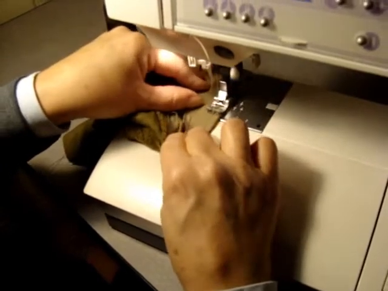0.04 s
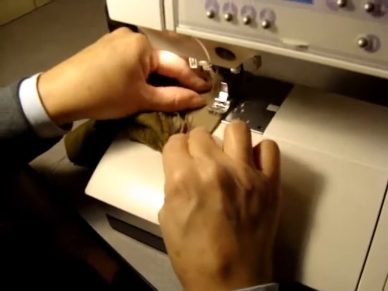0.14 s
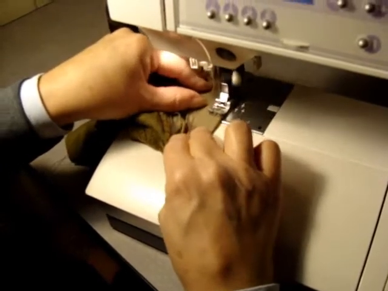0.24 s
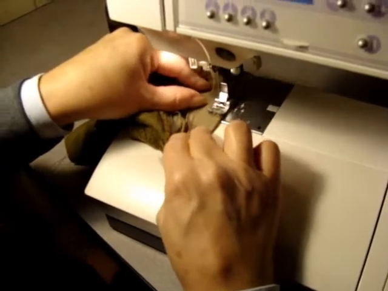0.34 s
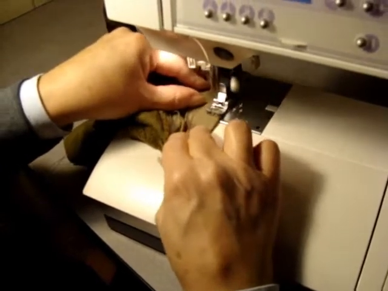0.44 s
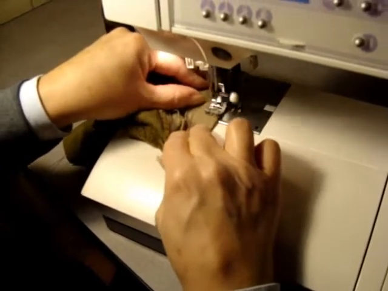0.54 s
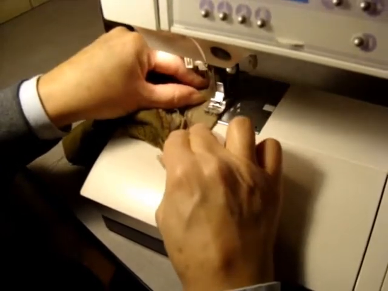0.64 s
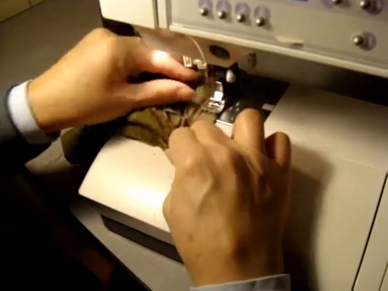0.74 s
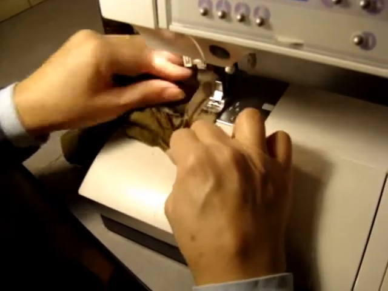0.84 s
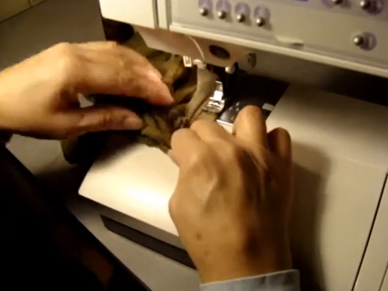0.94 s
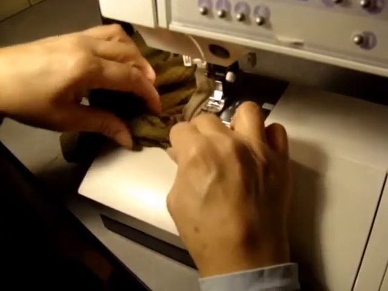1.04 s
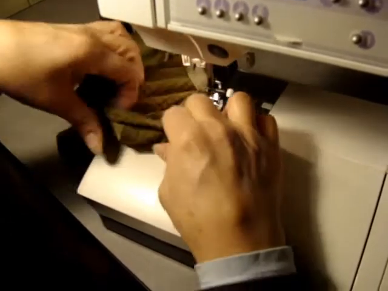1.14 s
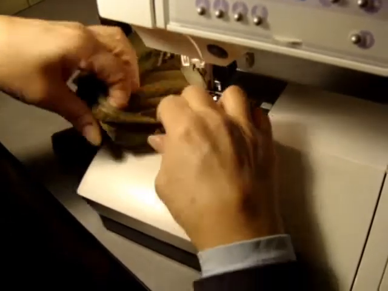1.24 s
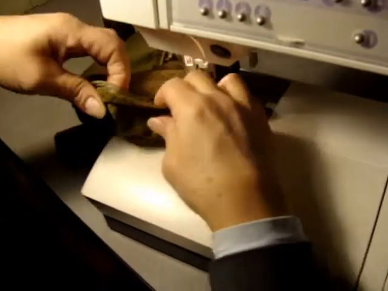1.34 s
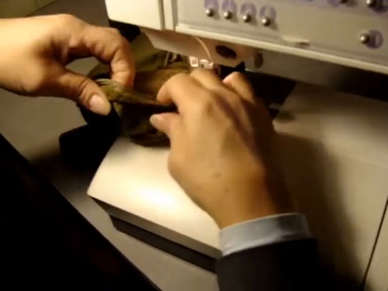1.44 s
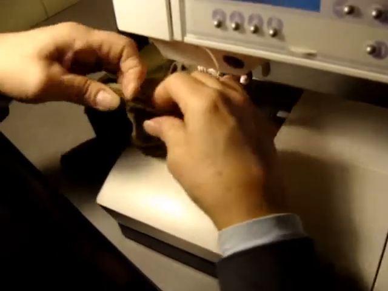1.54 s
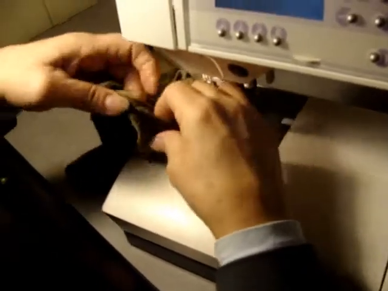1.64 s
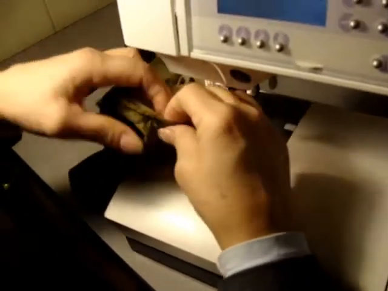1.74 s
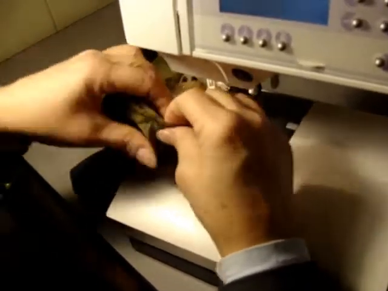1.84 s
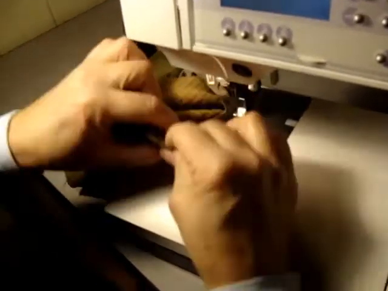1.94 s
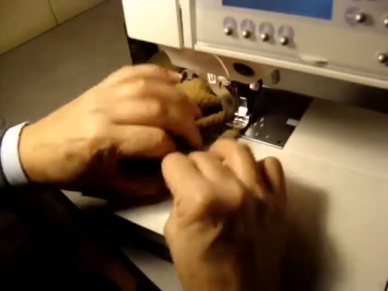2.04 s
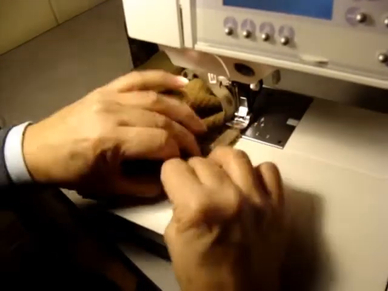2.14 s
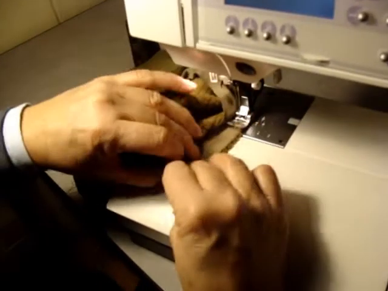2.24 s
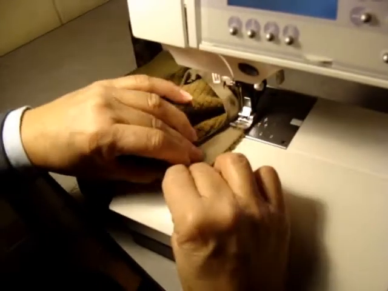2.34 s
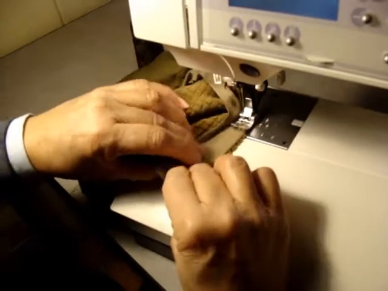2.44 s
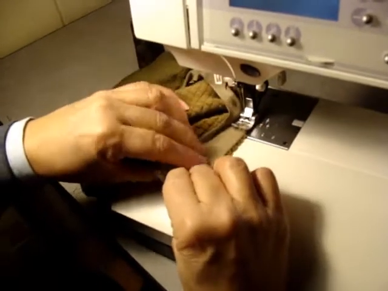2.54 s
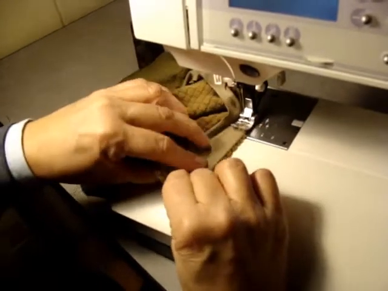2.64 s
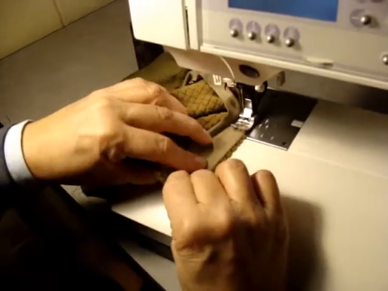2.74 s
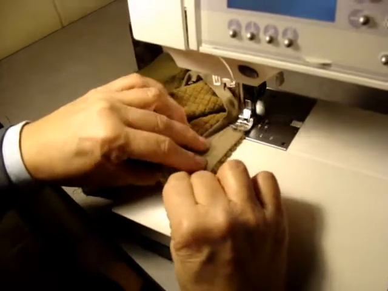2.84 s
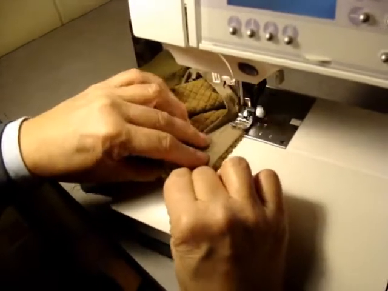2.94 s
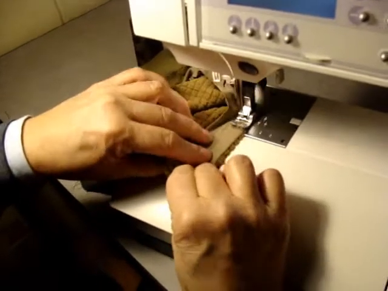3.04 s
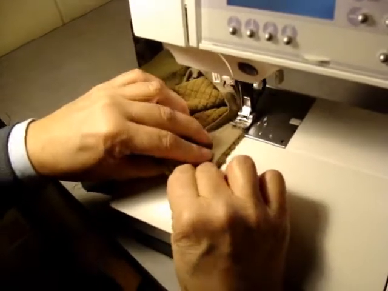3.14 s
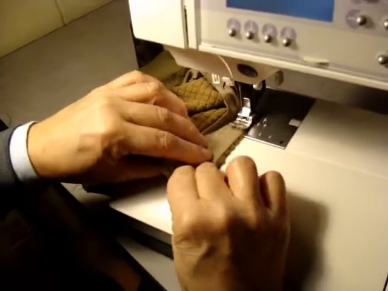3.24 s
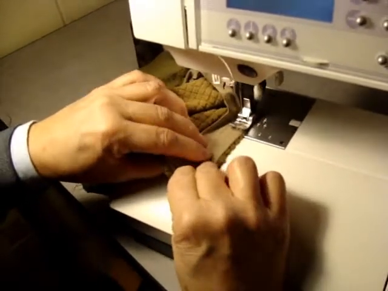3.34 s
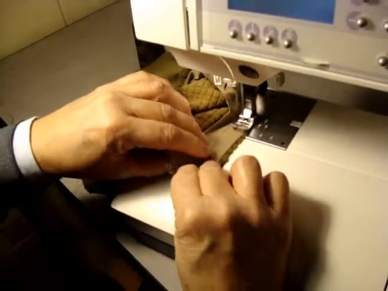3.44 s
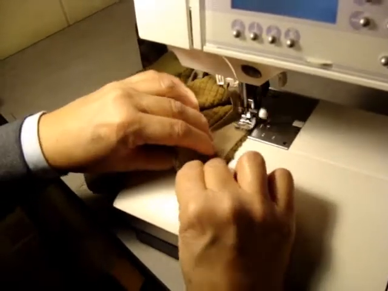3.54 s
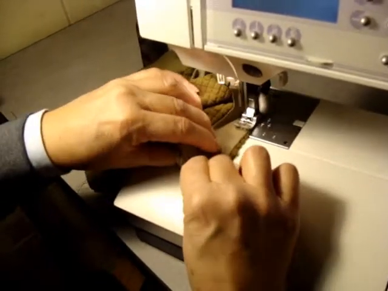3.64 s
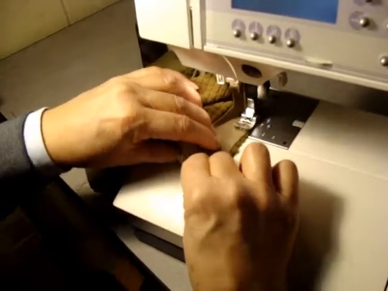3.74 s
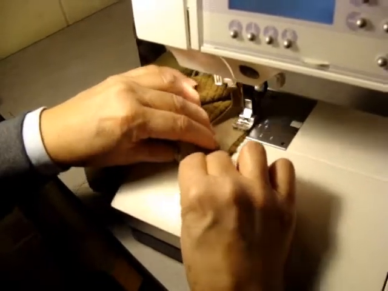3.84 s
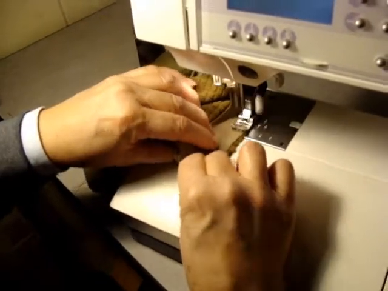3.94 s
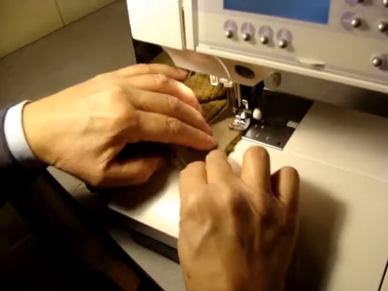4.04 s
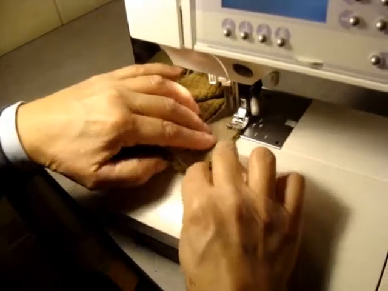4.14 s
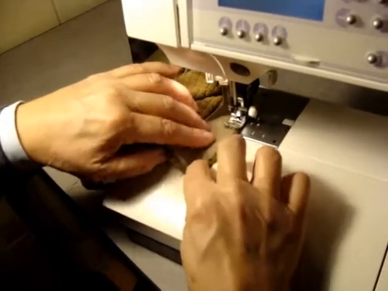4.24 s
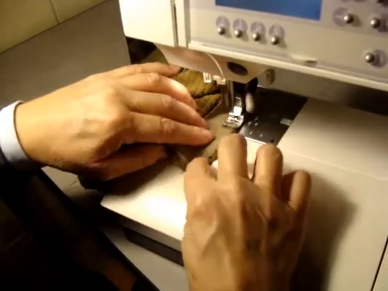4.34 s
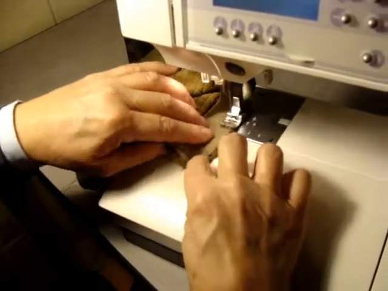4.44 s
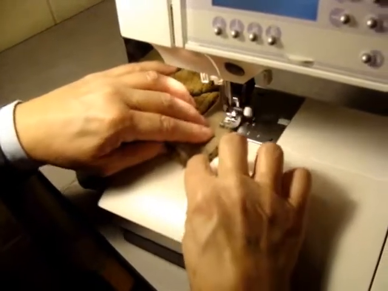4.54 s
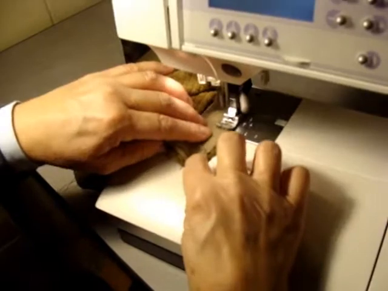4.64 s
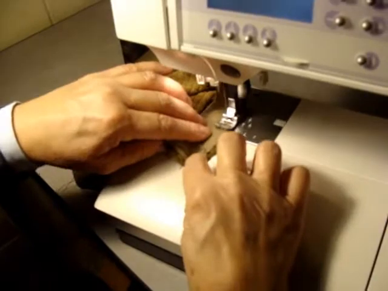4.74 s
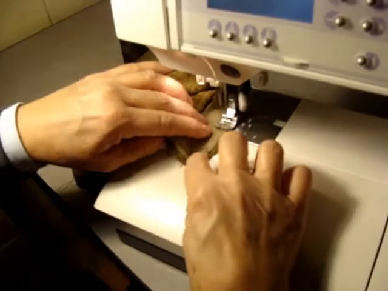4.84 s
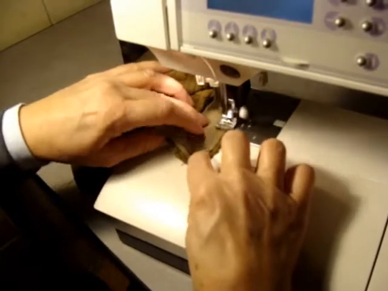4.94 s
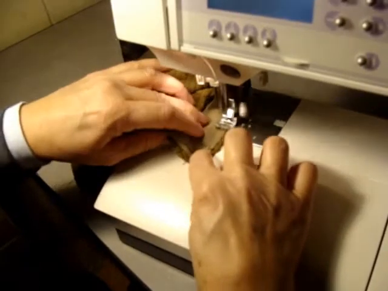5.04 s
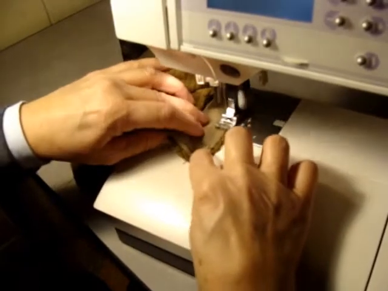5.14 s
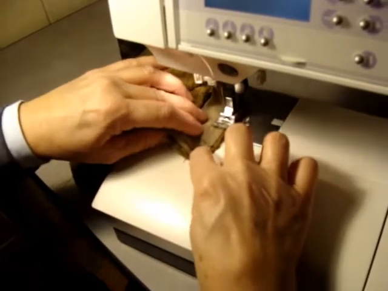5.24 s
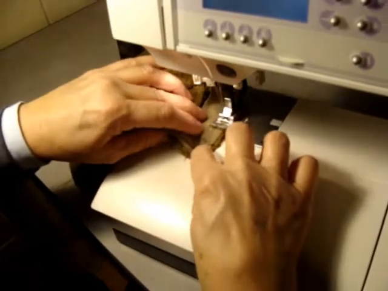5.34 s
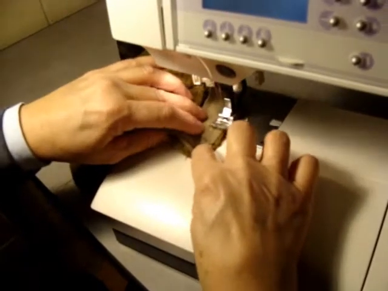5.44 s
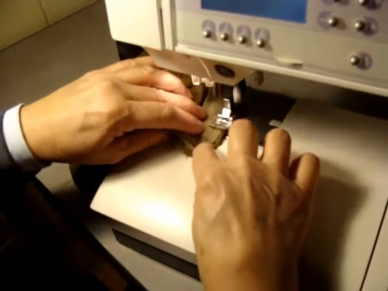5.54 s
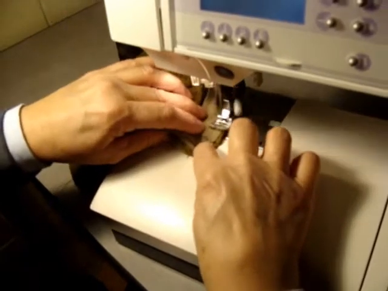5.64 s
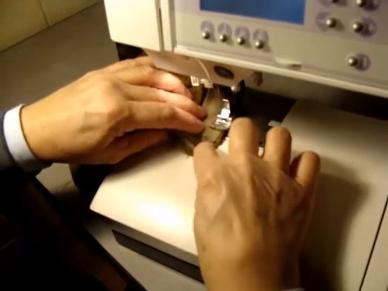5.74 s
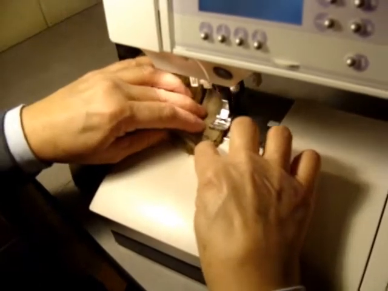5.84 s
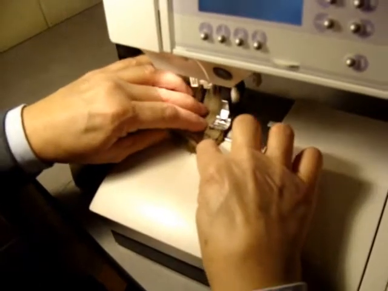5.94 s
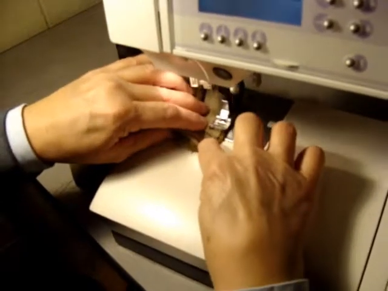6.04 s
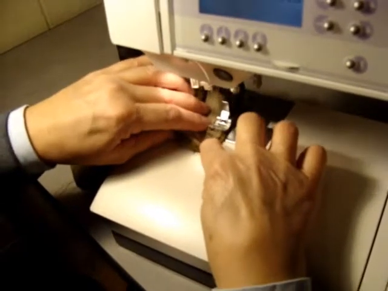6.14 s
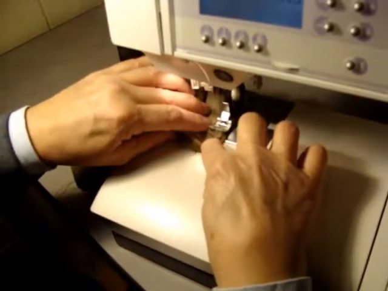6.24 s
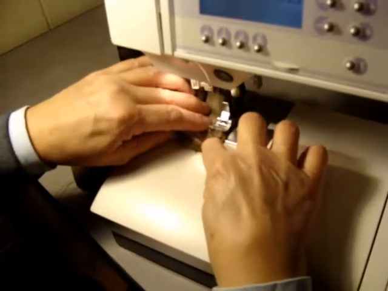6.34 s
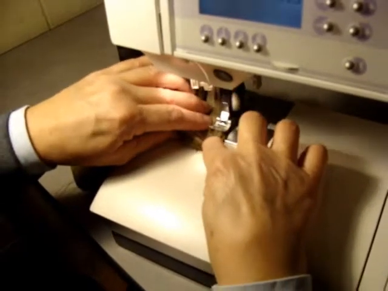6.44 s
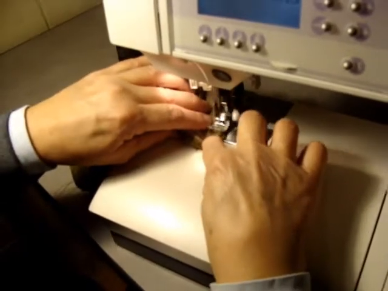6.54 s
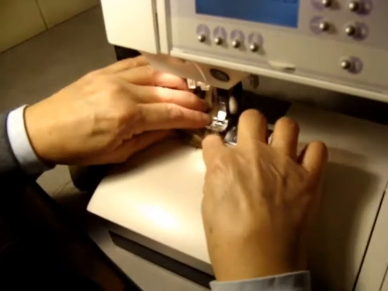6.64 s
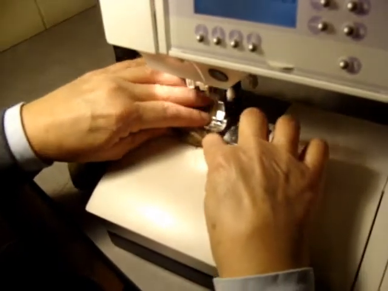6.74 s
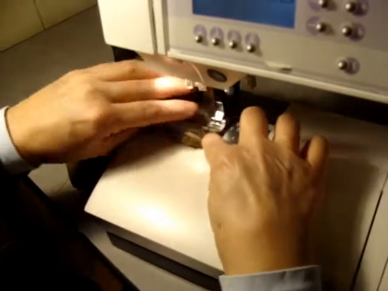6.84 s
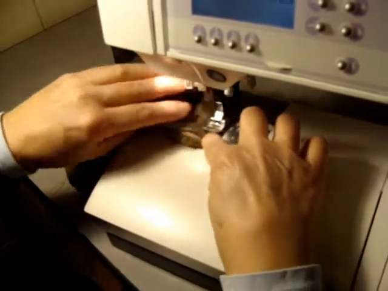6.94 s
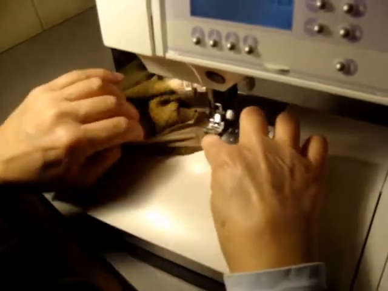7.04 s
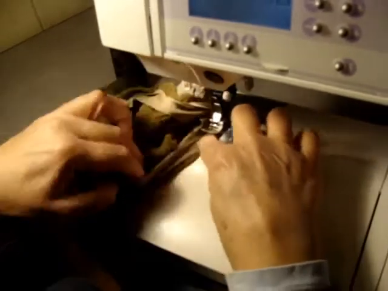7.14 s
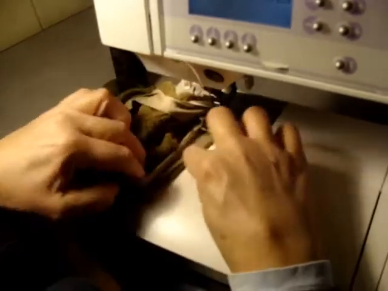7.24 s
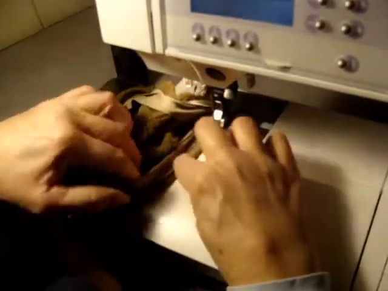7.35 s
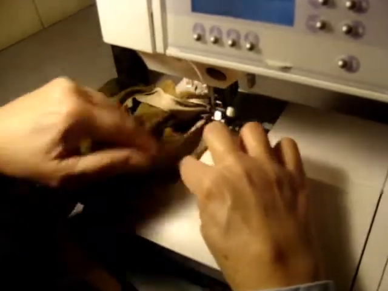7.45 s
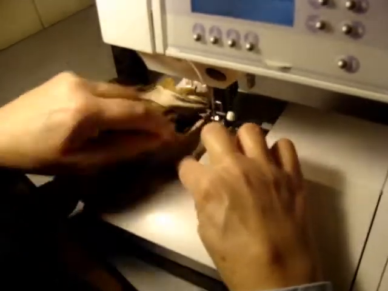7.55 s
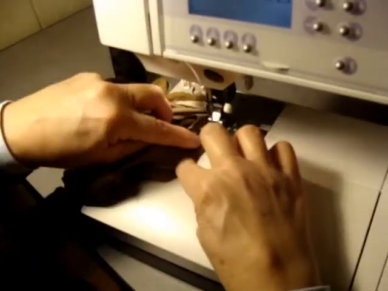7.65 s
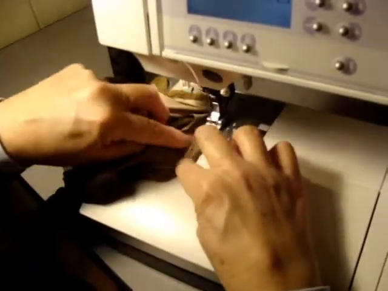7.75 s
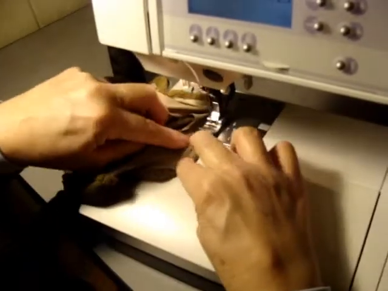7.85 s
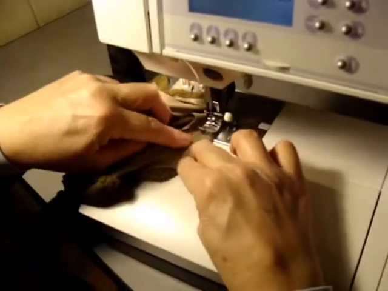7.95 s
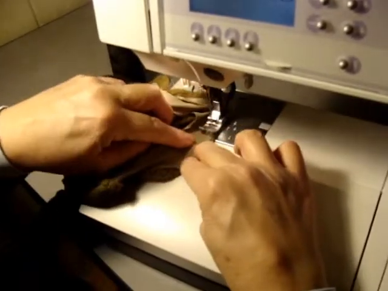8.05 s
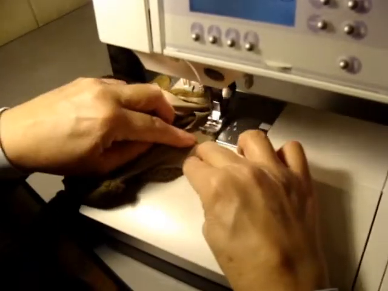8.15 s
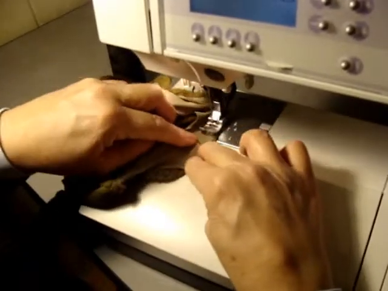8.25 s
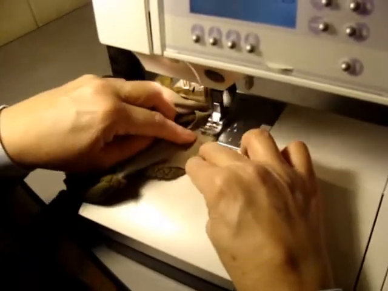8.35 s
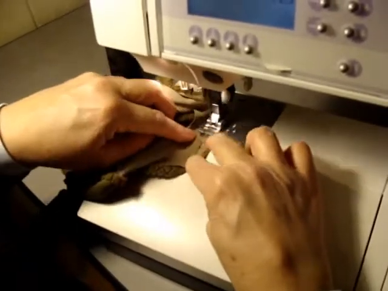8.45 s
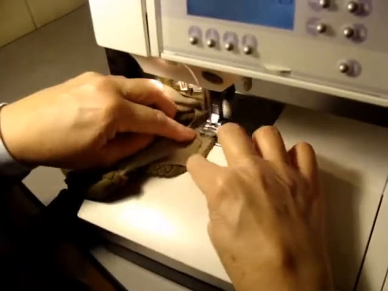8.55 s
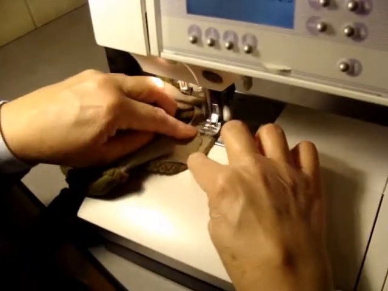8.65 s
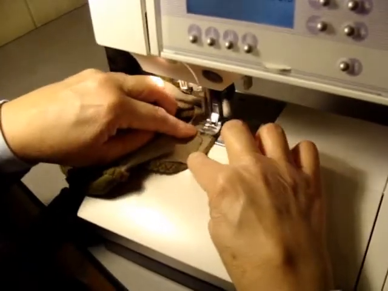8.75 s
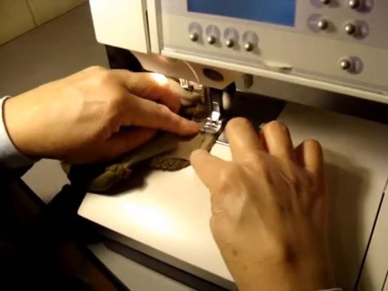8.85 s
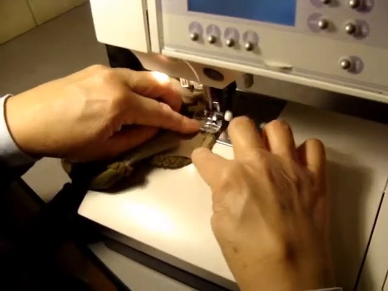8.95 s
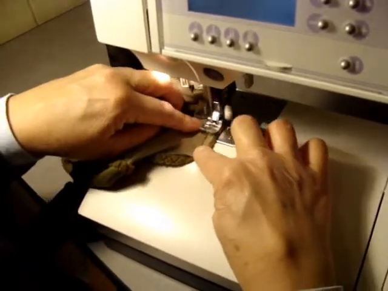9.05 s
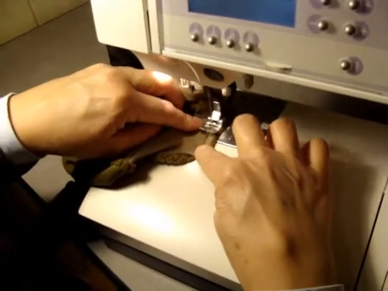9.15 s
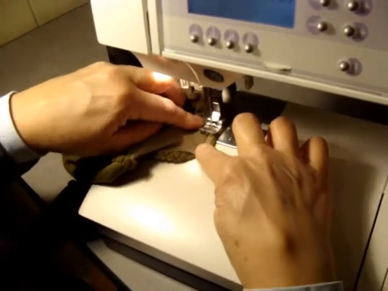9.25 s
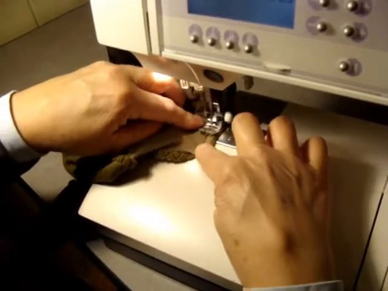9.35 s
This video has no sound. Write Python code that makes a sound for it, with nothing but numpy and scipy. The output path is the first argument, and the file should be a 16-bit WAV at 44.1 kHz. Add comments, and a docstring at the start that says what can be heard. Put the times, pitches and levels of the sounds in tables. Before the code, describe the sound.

Close mono sound of an electric sewing machine on a table: a short tail of slow stitching, a quiet pause with lone clicks and a dull bump, then about four seconds of rapid rattling stitches under a piercing nasal whine. It winds down into sparse ticks and creaky little contacts for a second, restarts with a lower growl, and climbs back to full whine. Short dull room echo and faint low air noise.

```python
"""A small room: an electric sewing machine sews in bursts on a table, heard by one close mono microphone.
Each brisk turn of the shaft brings the same knocks, struck on a ringing frame, and a rattle of small contacts.
The toothed drive is a swaying sine that whines, loudest where it meets the casing's ring near 1 kHz.
Between bursts the motor slows and lone parts click; a faint hum of sine lines dips when the rattle dies.
A hand bumps the table once; the walls return a dull tail of noise, over the steady air of the room."""
import sys
import numpy as np
from scipy import signal
from scipy.fft import rfft, irfft, next_fast_len
from scipy.io import wavfile
from scipy.ndimage import map_coordinates

SR = 44100
rng = np.random.default_rng(int(sys.argv[2]) if len(sys.argv) > 2 else 0)


def gain_from_db(level_db):
    """Turn a decibel level (scalar or array-like) into a linear amplitude factor."""
    decades = np.asarray(level_db, float) / 20
    return 10 ** decades


def unload_audio(sound):
    """Save the sound as a 16-bit wav file, at the path given as the first command line argument."""
    columns = np.transpose(np.atleast_2d(sound))
    # keep every value between -1 and 1, then stretch to whole-number steps
    steps = np.round(np.clip(columns, -1, 1) * 32767)
    wavfile.write(sys.argv[1], SR, steps.astype(np.int16))


N = 414540
BRISK_TURN_S = 0.25  # a shorter turn brings all the knocks and the repeating rattle


def rms_one(x):
    """Scale to unit power."""
    return x / np.sqrt(np.mean(x ** 2) + 1e-20)


def in_time(rows):
    """Columns of a curve table, sample by sample."""
    s, *columns = np.transpose(rows)
    return [np.interp(np.arange(N) / SR, s, column) for column in columns]


def drift(rate):
    """Slow random wander of spread about 1, through `rate` random points per second."""
    points = rng.standard_normal(int(N / SR * rate) + 3)
    return map_coordinates(points, [np.arange(N) / SR * rate], order=3)


def colour(x, spectrum, peaks=()):
    """Shape noise by a spectrum, lift its resonances and scale it to unit power."""
    size = next_fast_len(N)
    hz = np.arange(size // 2 + 1) * SR / size + 1e-3
    curve_hz, curve_db = np.transpose(spectrum)
    gain = gain_from_db(np.interp(np.log(hz), np.log(curve_hz), curve_db))
    for peak_hz, width_hz, db in peaks:
        resonance = 1 / (1 + 2j * (hz - peak_hz) / width_hz)
        gain = gain * (1 + (gain_from_db(db) - 1) * resonance)
    return rms_one(irfft(rfft(x, size) * gain, size)[:N])


def ring(x, hz, t60):
    """A damped resonance: a unit click sets a sine of height 1 ringing."""
    r, w = gain_from_db(-60 / (t60 * SR)), 2 * np.pi * hz / SR
    return signal.lfilter([0, np.sin(w)], [1, -2 * r * np.cos(w), r * r], x + 1e-18)


# needle bar strokes, between which the shaft turns evenly: (time [s], stroke level [dB])
STROKES = [(0.1286, -11), (0.451, -11), (0.7697, -13.5), (1.017, -17), (1.8409, -17), (3.026, -10.5),
           (3.1647, -10.5), (3.4028, -12), (4.2246, -14.5), (6.1885, -14), (6.8776, -12.5), (7.0167, -13),
           (7.431, -22), (8.2032, -10.5), (8.368, -11), (8.498, -11), (8.8779, -13.5), (9.377, -14)]
# whole turns done by each of those strokes: (count [turns])
TURN_COUNTS = [0, 2, 4, 5, 6, 7, 8, 10, 17, 34, 40, 41, 42, 43, 44, 45, 48, 52]


def turns():
    """Start (s), length (s) and stroke dB of every shaft turn, one more added in front."""
    count = np.arange(TURN_COUNTS[-1] + 1)
    s, db = (np.interp(count, TURN_COUNTS, column) for column in np.transpose(STROKES))
    start = np.r_[2 * s[0] - s[1], s]
    length = np.r_[np.diff(start), s[-1] - s[-2]]
    return start, length, np.r_[db[0], db]


# colour of the room's air: (frequency [Hz], relative level [dB])
AIR = [(15, -35), (25, 3.5), (113, -11.5), (273, 5), (333, -4.5), (538, 1.5), (746, -2.5), (1260, -13),
       (1750, -5.5), (2090, -13.5), (4120, -14.5), (9220, -21.5), (10200, -11.5), (13300, -77.5),
       (22000, -120)]
# a low waver in the room: (frequency [Hz], width [Hz], lift [dB])
LOW_WAVER = [(128, 12, 18.5)]


def room_air():
    """The still air of the room: coloured noise whose level wanders slowly."""
    return gain_from_db(-51.5 + drift(1.3)) * colour(rng.standard_normal(N), AIR, LOW_WAVER)


# load on the teeth round one turn: (angle [turn], added force at top pace [dB], at middle pace [dB])
TURN_LOAD = [(0.0, -3.5, -13), (.06, -5, -5.5), (.2, 0, -6), (0.329, -11, -3.5), (.42, -13, -8),
             (.52, -24, -4), (.6, 0, 7), (.7, -3, -11), (.77, 0, -1.5), (.84, -7, -14.5), (.92, 2, 5)]
# overtones of the mesh: (multiple of its rate [ratio], level under the mesh force [dB])
MESH_OVERTONES = [(2.002, -25)]
# speed sway once a turn, at slow, middle and top pace: (depth [%], fastest at angle [turn])
TURN_SWAY = [(7.164, .3), (.6, 0.37), (1.616, 0.715)]


def whine(mesh_hz, force_db):
    """Teeth mesh at a rate that sways round the turn; the casing amplifies it near its ring."""
    slow_pace, middle_pace, top_pace = 6.5, 8.1, 8.4  # turns per s
    stall_hz, free_hz = 620, 750  # the slow sway sets in between these mesh rates
    rotor_turns, rotor_throb_db, rotor_at_turn = 10, 1.5, 0.078  # rotor turns per shaft turn
    ripples_per_turn, ripple_percent, ripple_at_turn = 8, 1.4, 0.035
    casing_hz, casing_width_hz, bypass_db = 1008, 80, -18.5

    start, length, _ = turns()
    edges_s = np.r_[start, start[-1] + length[-1]]
    angle = np.interp(np.arange(N) / SR, edges_s, np.arange(len(start) + 1))
    pace = np.interp(angle, np.arange(len(start)) + 0.5, 1 / length)
    # shares of the three paces, fading into one another
    paces = [slow_pace, middle_pace, top_pace]
    slow, middle, top = (np.interp(pace, paces, row) for row in np.eye(3))

    turn, top_db, middle_db = np.transpose(TURN_LOAD)
    load_db = top * np.interp(angle, turn, top_db, period=1)
    load_db = load_db + middle * np.interp(angle, turn, middle_db, period=1)
    load_db = load_db + rotor_throb_db * np.cos(2 * np.pi * rotor_turns * (angle - rotor_at_turn))

    freedom = np.interp(mesh_hz, [stall_hz, free_hz], [0, 1])
    sway = ripple_percent * np.cos(2 * np.pi * ripples_per_turn * (angle - ripple_at_turn))
    for share, (percent, at) in zip((slow * freedom, middle, top), TURN_SWAY):
        sway = sway + share * percent * np.cos(2 * np.pi * (angle - at))

    # slow running is rougher
    slowness = np.clip(0.96 - mesh_hz / casing_hz, 0, 1)
    unevenness = 0.002 + 0.25 * slowness * np.interp(mesh_hz, [stall_hz, free_hz], [0.2, 1])
    unsteady_db = (0.6 + 20 * np.minimum(slowness, 0.2)) * drift(90)

    rate_hz = mesh_hz * (1 + sway / 100 + unevenness * drift(260))
    phase = 2 * np.pi * np.cumsum(rate_hz) / SR
    force = gain_from_db(force_db + load_db + unsteady_db)
    mesh = force * np.sin(phase)
    t60 = np.log(1000) / (np.pi * casing_width_hz)
    # scaled to gain 1 at the top of the resonance
    casing = ring(mesh, casing_hz, t60) * 2 * np.pi * casing_width_hz / SR
    overtones = sum(gain_from_db(db) * np.sin(multiple * phase) for multiple, db in MESH_OVERTONES)
    return casing + gain_from_db(bypass_db) * mesh + force * overtones


# colour of the rattle: (frequency [Hz], relative level [dB])
RATTLE_COLOUR = [(40, -40.5), (95, -33), (135, -29.5), (220, -23), (400, -20), (700, -17), (1000, -8),
                 (1400, -15.5), (1800, -17.5), (2500, -22), (4000, -17.5), (5500, -22.5), (7000, -43.5),
                 (10000, -49.5)]
# panels that the rattle sets ringing: (frequency [Hz], width [Hz], lift [dB])
RATTLE_PANELS = [(132.8, 7.3, 15.5), (195, 5.4, 9.5), (321, 12, 3), (576, 180, 8.5), (803, 17, 2.5),
                 (828, 17, 7.5), (1006.7, 32, 10), (1100, 134, 9), (1313, 29, 6.5), (1420, 73, 5.5),
                 (2020, 55, 7.5), (2530, 190, 9), (3830, 114, 6.5)]


def rattle(level_db, repeating=0.7, spread_db=3, count=400):
    """Small contacts that come back at the same angles every brisk turn, over fresh friction noise."""
    start, length, _ = turns()
    angles = rng.random(size=count)
    sizes = gain_from_db(spread_db * np.minimum(rng.exponential(size=count), 3))
    sizes = sizes * rng.choice([-1, 1], size=count)
    # liveliest round the stroke
    sizes = sizes * gain_from_db(5 * np.exp(-angles / 0.15) + 3 * np.exp((angles - 1) / 0.1))
    at = ((start[:, None] + length[:, None] * angles) * SR).astype(int)
    # even power at any brisk pace
    weight = sizes * np.sqrt(length[:, None]) * (length[:, None] < BRISK_TURN_S)
    inside, ticks = (at >= 0) & (at < N), np.zeros(N)
    np.add.at(ticks, at[inside], weight[inside])
    friction = rng.standard_normal(N)
    grit = np.sqrt(repeating) * rms_one(ticks) + np.sqrt(1 - repeating) * friction
    return gain_from_db(level_db + 7 + drift(25)) * colour(grit, RATTLE_COLOUR, RATTLE_PANELS)


# hum near multiples of twice the mains rate: (frequency [Hz], relative level [dB])
HUM_LINES = [(360.7, -51), (479.1, -51.5), (597.5, -50.5), (721.4, -62)]


def hum(level_db):
    """The motor buzzes in wavering sines near multiples of twice the mains rate."""
    t = np.arange(N) / SR
    lines = np.zeros(N)
    for hz, db in HUM_LINES:
        cycles = hz * t + 0.2 * drift(18) + rng.random()
        lines += gain_from_db(db + 4 * drift(12)) * np.sin(2 * np.pi * cycles)
    return gain_from_db(level_db) * rms_one(lines)


# the motor: (time [s], tooth mesh rate before sway [Hz], mesh force before load [dB],
#             rattle [dB, raised by 7 in rattle()])
MOTOR_COURSE = [(0, 759, -23, -36.5), (.8, 776, -23.5, -38), (.9, 641, -24, -41), (1.0, 498, -56, -52.5),
                (1.8, 500, -70, -49), (1.92, 504, -77, -69), (2.845, 504.5, -82, -78),
                (2.87, 652.4, -17.5, -31), (2.97, 639.4, -24.5, -30.5), (3.04, 800, -24.5, -33),
                (3.15, 985, -9.5, -30), (3.7, 1013, -11.5, -34), (5.2, 1023, -14, -34.5),
                (6.93, 1024, -13, -33), (7.0, 897, -33, -44.5), (7.06, 650, -22, -35.5),
                (7.14, 555, -59, -50), (7.5, 500, -75, -44.5), (7.65, 500, -75, -51.5),
                (7.86, 500, -75, -50.5), (8.05, 560, -60, -33.5), (8.125, 612, -21, -33),
                (8.27, 612, -20.5, -39), (8.31, 772, -28, -32), (8.36, 973, -17.5, -31.5),
                (8.6, 970, -16.5, -32.5), (9.4, 985, -14.5, -34)]


def motor():
    """One motor drives whine, rattle and hum; the hum dies with the rattle but is capped at -52 dB."""
    mesh_hz, force_db, rattle_db = in_time(MOTOR_COURSE)
    return whine(mesh_hz, force_db) + rattle(rattle_db) + hum(np.minimum(rattle_db, -52))


# knocks of a brisk turn, the first of which is the stroke that comes in every turn:
# (angle after the stroke [turn], level against the stroke [dB], relative thud [dB],
#  relative edge [dB], scuff t60 [s])
TURN_KNOCKS = [(0, -0.5, -9, 4.5, 0.018), (.035, -3.5, -14.5, -13, 0.022), (.085, -4.5, -5, -9.5, 0.014),
               (.14, -16.5, -5.5, -27.5, 0.011), (.26, -23.5, 1.5, 11, 0.07), (.47, -17, -31.5, 7, 0.0097),
               (.62, -14.5, -13, 4, 0.032), (.75, -17.5, -8, -1.5, 0.03), (.87, -6, -19, -21, 0.0057),
               (.965, -5, -27.5, -19, 0.055)]
# what the frame rings with when knocked: (frequency [Hz], relative level [dB], t60 [s])
FRAME_MODES = [(344, -12, 0.052), (351, -12, 0.072), (431, -6.5, 0.033), (593, -7, 0.044),
               (769, -9.5, 0.044), (1207, -4.5, 0.07), (1590, -3, 0.027), (1915, -5, 0.038),
               (2120, -18.5, 0.044), (2630, 0.5, 0.028), (2900, 9.5, 0.0059), (3435, -4, 0.031),
               (3760, 3, 0.0062), (4260, 14, 0.003), (5330, 6.5, 0.0078), (5890, 8.5, 0.0037),
               (6530, 14, 0.0017), (7330, 0, 0.0088), (9700, -16, 0.0081), (9640, -4, 0.0091)]


def knocks():
    """Looped knocks and lone clicks strike the frame; a part strikes it much the same way each turn."""
    stroke_spread_db, ring_db = 0.56, -17  # ring_db: the ringing under the dry clatter
    rise_share = 0.22  # a contact builds up over this share of its decay time
    start, length, stroke_db = turns()
    stroke_db = stroke_db + stroke_spread_db * rng.standard_normal(len(start))
    rows = []
    for begin, span, db in zip(start, length, stroke_db):
        for k, (turn, under, thud, edge, scuff) in enumerate(TURN_KNOCKS):
            if span < BRISK_TURN_S or k == 0:
                rows.append((begin + turn * span, db + under, thud, edge, scuff, k))
    rows += [(*click, len(TURN_KNOCKS) + k) for k, click in enumerate(lone_clicks())]
    rows = [row for row in rows if 0 <= row[0] < N / SR]
    s, db, thud_db, edge_db, scuff, part = np.array(rows).T
    part, t = part.astype(int), np.arange(1200) / SR

    habit = rng.standard_normal((part.max() + 1, len(FRAME_MODES)))[part]
    chance = rng.standard_normal((len(s), len(FRAME_MODES) + 1))
    # slack in the linkage shifts the looped knocks, but not the stroke
    play = 0.001 * chance[:, -1] * (part > 0) * (part < len(TURN_KNOCKS))
    at = ((s + play)[:, None] * SR + np.arange(len(t))).astype(int).clip(0, N - 1)

    # a contact is a short scuff of tiny impacts, partly the part's own, partly new
    own_grit = rng.standard_normal((part.max() + 1, len(t)))[part]
    grit = own_grit + 0.8 * rng.standard_normal(at.shape)
    decay = gain_from_db(-60 * t / np.clip(scuff, 0.001, 0.1)[:, None])
    rise = np.minimum(t / (rise_share * scuff[:, None]), 1)
    scuffs = grit * decay * rise
    force = scuffs / np.sqrt(np.sum(scuffs ** 2, axis=1, keepdims=True))
    # the heavy low modes feel the contact as one blow
    shove = (t == 0) * np.ones_like(force)

    ringing = np.zeros(N)
    for k, (hz, mode_db, t60) in enumerate(FRAME_MODES):
        tone_db = thud_db + 17 if hz < 1000 else edge_db if hz > 5000 else 0
        varied_db = 2.2 * (hz > 1000) * habit[:, k] + 2 * chance[:, k]
        gain = gain_from_db(db + tone_db + mode_db + varied_db)
        push = force if hz > 1000 else shove
        ringing += ring(np.bincount(at.ravel(), (gain[:, None] * push).ravel(), N), hz, t60)
    # the small frame radiates no bass
    ringing = signal.sosfilt(signal.butter(4, 250, "high", fs=SR, output="sos"), ringing)

    clatter = np.zeros(N)
    for band_db, low_hz, high_hz in [(db, 1000, 5000), (db + edge_db - 3, 5000, 8800)]:
        impacts = np.bincount(at.ravel(), (gain_from_db(band_db)[:, None] * scuffs).ravel(), N)
        band = signal.butter(2, [low_hz, high_hz], "band", fs=SR, output="sos")
        clatter += signal.sosfilt(band, impacts)
    return gain_from_db(ring_db) * ringing + clatter


def walls(x, t60=0.29):
    """Dull reverberation: a dying noise tail that starts a few milliseconds late."""
    t = np.arange(int(0.3 * SR)) / SR
    dull_noise = signal.lfilter([1], [1, -0.6], rng.standard_normal(len(t)))
    tail = dull_noise * gain_from_db(-60 * t / t60) * (t > 0.006)
    return signal.fftconvolve(x, tail / np.sqrt(np.sum(tail ** 2)))[:N]


# lone clicks while the shaft creeps, stops or starts:
# (time [s], relative level [dB], relative thud [dB], relative edge [dB], scuff t60 [s])
CLEAR_CLICKS = [(1.1774, -25, -6, -9, .02), (1.263, -28.5, -4, -13, 0.01), (1.276, -23, -4, -14, 0.035),
                (1.3574, -32, -8, -2, 0.027), (1.4272, -24, -29, -30, 0.0065),
                (1.6784, -26.5, -13, 0, 0.022), (1.7599, -15.5, -11, -28, 0.0079),
                (1.8008, -22, -23, -8, 0.028), (1.8338, -14, -30, -23, .045), (2.208, -27, -6, -6, 0.035),
                (2.3715, -11, -16.5, -8.5, 0.014), (2.395, -46, 19, -21, .015),
                (2.588, -31, -4, -24, 0.032), (2.782, -35.5, 0, -19, 0.056),
                (2.8536, -14.5, -20, -4, 0.013), (2.858, -9.5, -8.5, -13, 0.028),
                (2.9332, -30, -8, 13, 0.014), (7.1327, -29, -3, -5, 0.021), (7.1848, -27, -5, -16, 0.025),
                (7.3108, -31, 6.5, -13, 0.013), (7.3395, -21, -13, -3, 0.051),
                (7.4067, -24.5, -6, -4, 0.032), (7.426, -13, -12, -8, 0.035),
                (7.4439, -22, -5.5, -17, 0.016), (7.5168, -25, -4, -23, 0.018),
                (7.6277, -31.5, -17, 3, 0.014), (7.659, -29.5, -15, -1, 0.026),
                (7.845, -21.5, -10, -4, 0.034), (7.885, -20.5, -14, -7, .022), (7.9619, -25, -5, -5, 0.015),
                (7.984, -12.5, -11, -10, .025), (8.0034, -22, -2, 9, 0.012), (8.051, -14.5, -6, -12, 0.012),
                (8.1695, -22, -8, 5, 0.014)]
# spells in which faint ticks come at random: (from [s], to [s])
CREEPING_SPELLS = [(1.02, 1.95), (7.1, 8.15)]


def lone_clicks(count=3):
    """Single contacts: the clear clicks, and a few faint scuffs at random in each creeping spell."""
    level_db, spread_db, thud_db, edge_db, t60_s = -35, 2.5, -5, -6, 0.05
    ticks = []
    for begin, end in CREEPING_SPELLS:
        for _ in range(count):
            when = begin + (end - begin) * rng.random()
            ticks.append((when, level_db + spread_db * rng.standard_normal(), thud_db, edge_db, t60_s))
    return CLEAR_CLICKS + ticks


def bump():
    """A hand bumps the table: one low thump, a quickly damped sine."""
    at_s, level_db, hz, t60_s = 1.762, -16, 112, 0.008
    click = np.arange(N) == int(at_s * SR)
    return ring(gain_from_db(level_db) * click, hz, t60_s)


def scene():
    """The machine on its table, the knocks' echo from the walls and the still air of the room."""
    air = room_air()
    drive = motor()
    blows = knocks()
    echo = gain_from_db(-22.5) * walls(blows)
    return (air + drive + blows + echo + bump())[None]


def band_limit(x):
    """A steep low-pass at the top of the band."""
    return signal.sosfilt(signal.butter(12, 10550, fs=SR, output="sos"), x)


def record(dry):
    """The close microphone loses the deep bass, peaks are rounded and the treble is cut."""
    bass_cut_hz, ceiling, treble_stop_hz = 35, 0.75, 10665  # ceiling: share of full scale
    thin = signal.sosfilt(signal.butter(2, bass_cut_hz, "high", fs=SR, output="sos"), dry)
    rounded = ceiling * np.tanh(thin / ceiling)
    # 50 dB down from the stop frequency upward
    treble_cut = signal.cheby2(12, 50, treble_stop_hz, fs=SR, output="sos")
    mix = signal.sosfilt(treble_cut, rounded)
    return band_limit(mix)


dry = scene()
out = record(dry)
unload_audio(out)
```